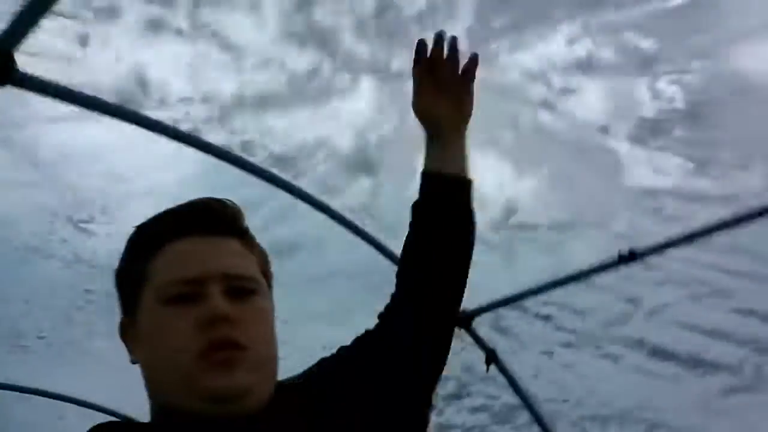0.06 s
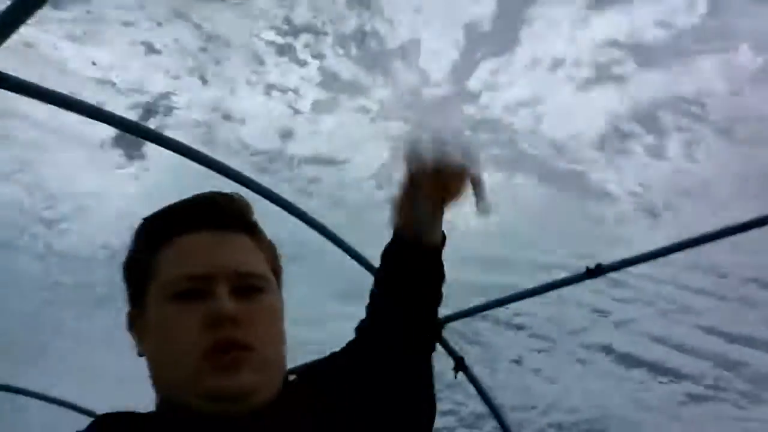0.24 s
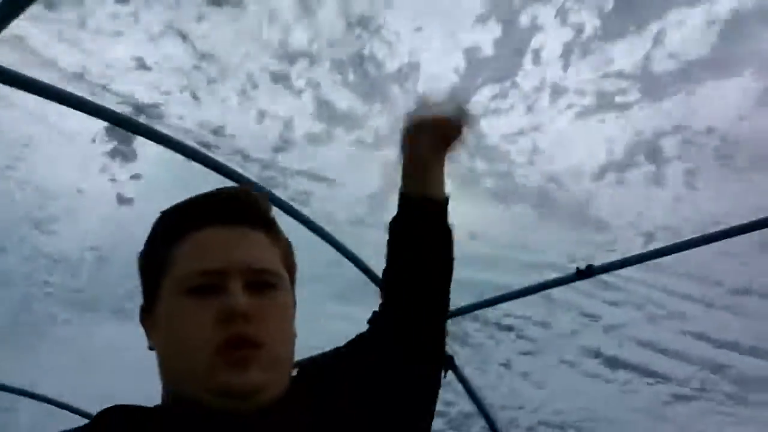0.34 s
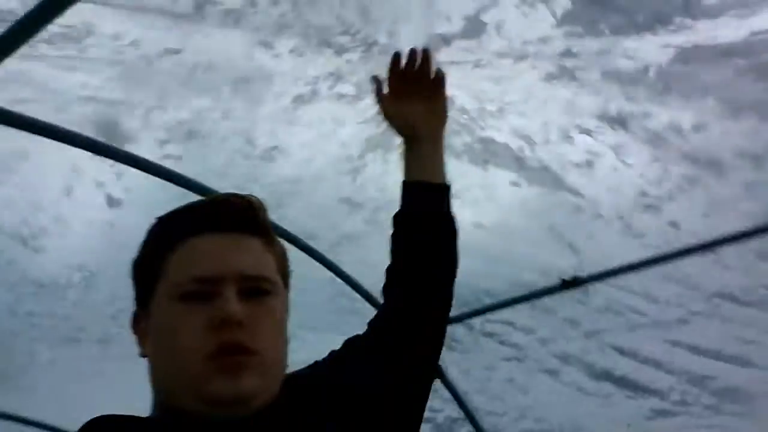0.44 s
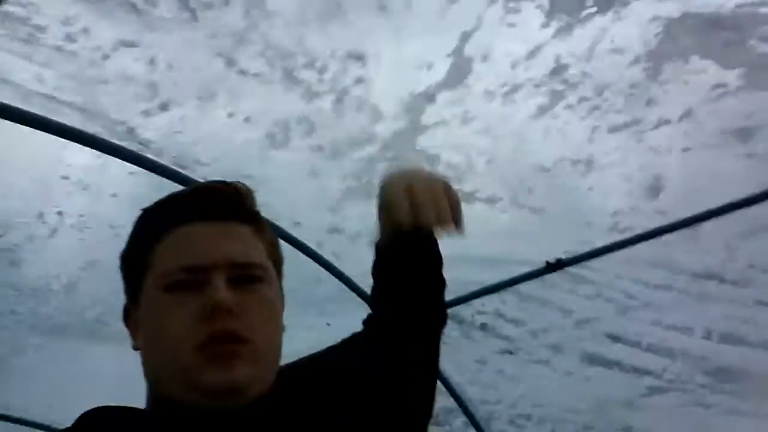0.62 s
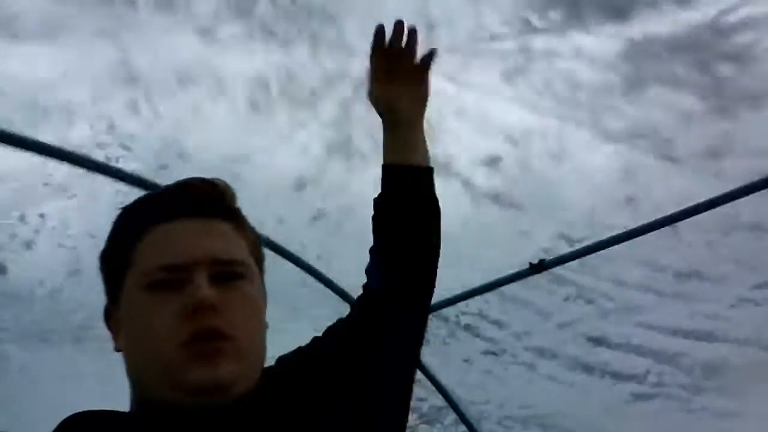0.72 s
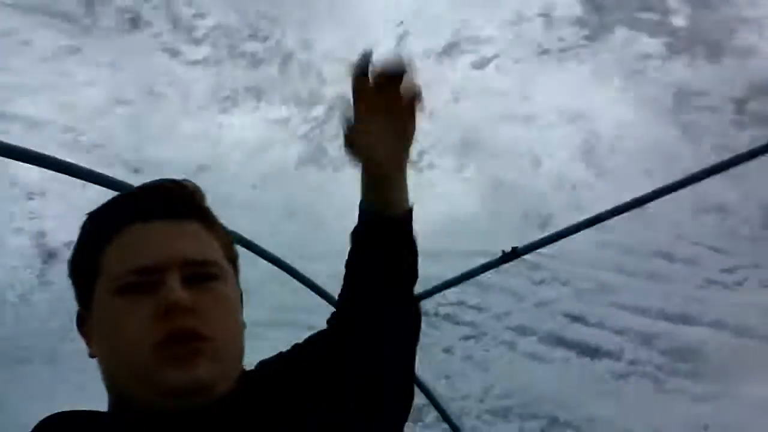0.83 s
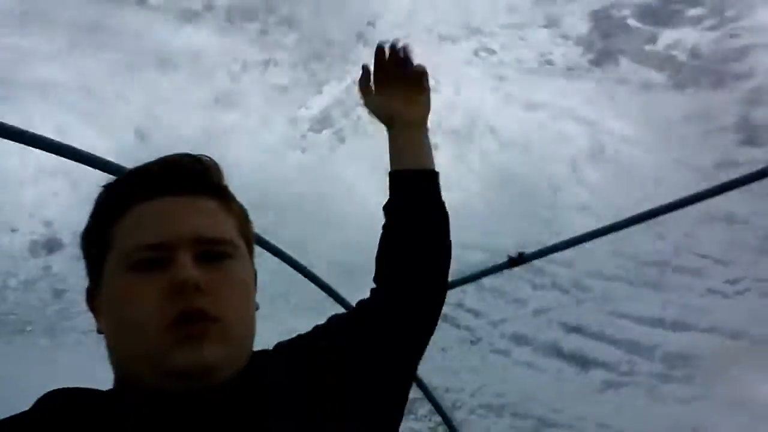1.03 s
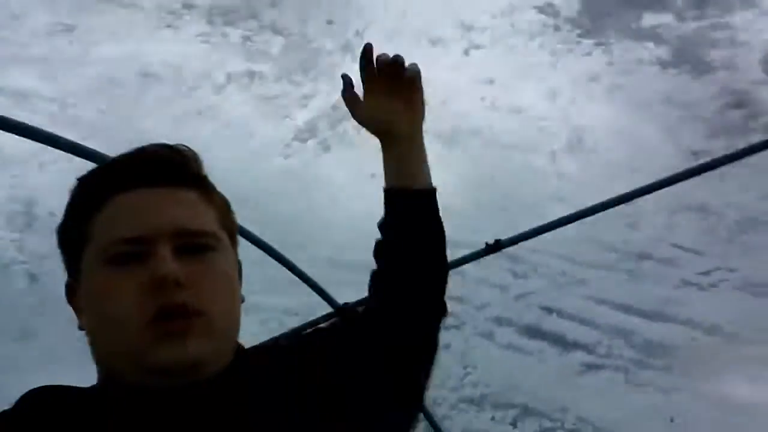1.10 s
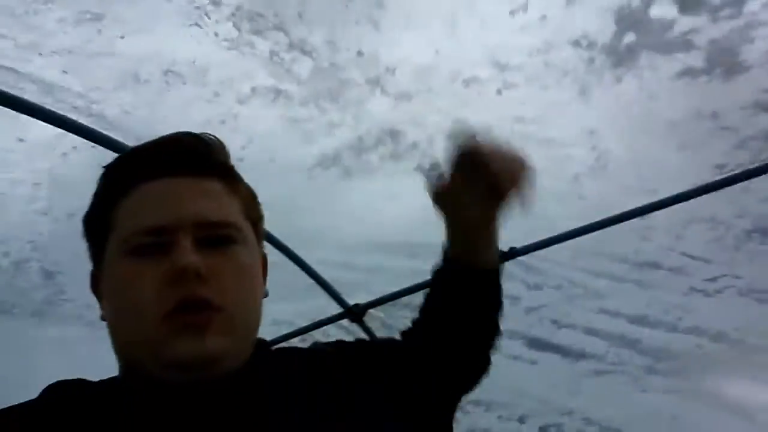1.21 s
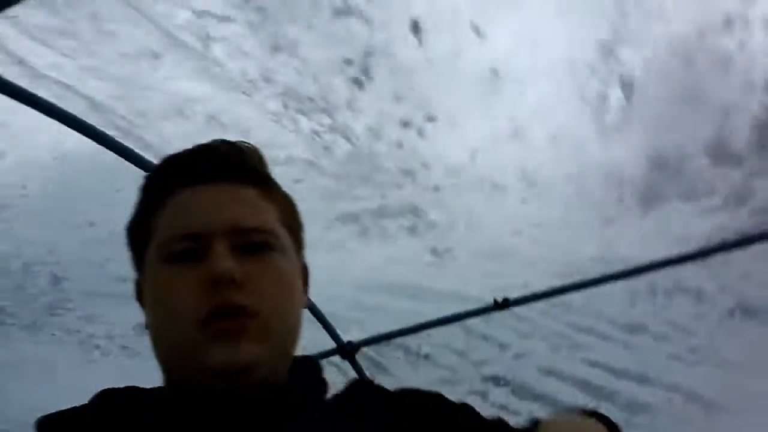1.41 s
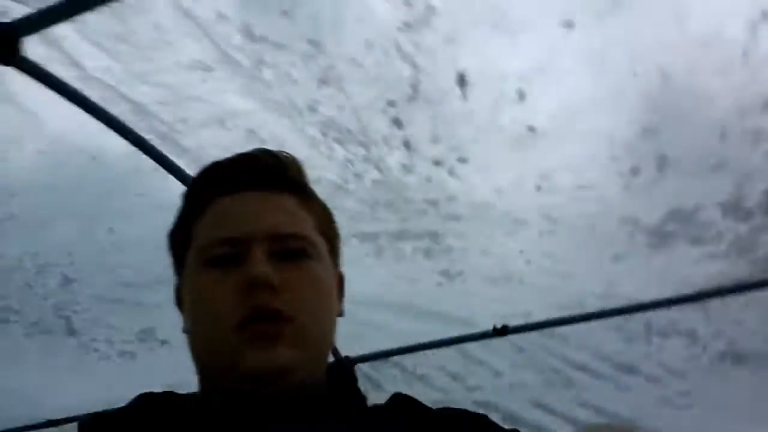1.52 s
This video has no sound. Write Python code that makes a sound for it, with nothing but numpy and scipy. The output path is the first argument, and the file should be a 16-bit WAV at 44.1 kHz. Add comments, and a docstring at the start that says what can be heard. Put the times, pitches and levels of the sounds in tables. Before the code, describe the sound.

A hand strikes a stretched plastic cover four times, at about 0.2, 0.5, 0.85 and 1.15 seconds. Each blow is a loud, low thump with a sharp crinkle, followed by a short flutter and fading rustle. The last snaps hardest and dies away by 1.5 seconds. The hits sound close, with slight reflections under the cover, while a steady hiss and faint patter continue throughout.

```python
"""Under a wet plastic cover stretched over a hoop frame, a hand pushes up four times against the film.
At each blow creases crinkle as the hand meets them; the film snaps taut, radiating pressure pulses
and a low thump from its damped modes, then shakes out in a dying rustle. Short reflections gather
beneath the cover. Between blows a steady hiss and a light patter on the cover remain."""
import sys
import numpy as np
from scipy import signal
from scipy.fft import rfft, irfft
from scipy.io import wavfile

SR = 44100
rng = np.random.default_rng(int(sys.argv[2]) if len(sys.argv) > 2 else 0)


def generate_wav(sig):
    """Save sig (samples, or channels by samples) to the path in sys.argv[1] as 16-bit PCM at SR."""
    pcm = np.round(np.clip(np.atleast_2d(sig).T, -1, 1) * 32767).astype(np.int16)
    wavfile.write(sys.argv[1], SR, pcm)


N = 68355

# Spectrum of the hiss: frequency_hz, relative_density_db
HISS_SPECTRUM = [(30, -41), (65, -13.5), (140, -2.5), (300, 0.5), (600, 1.5), (1500, -1), (3000, -3),
                 (5700, -4), (7200, -9.5), (9500, -19), (15500, -17.5)]
# Slow drift of the hiss: time_s, level_db
HISS_LEVEL = [(0, -31.5), (.13, -35.5), (.47, -35.5), (.78, -36.5), (1.08, -36), (1.4, -35.5),
              (1.55, -37.5)]
# Drift of its treble: time_s, gain_db
HISS_TREBLE = [(0, -2), (.12, -1.5), (.45, 1.5), (.78, 5), (1.1, 4), (1.55, 4)]
# Spectrum of the dying rustle: frequency_hz, relative_density_db
RUSTLE_SPECTRUM = [(40, -30), (100, -2.5), (300, -0.5), (650, 3.5), (1300, -3), (2800, -5), (5800, -9),
                   (9300, -20), (15500, -37)]
# The film flaps back or a crease ticks: start_s, level_db, t60_s
FLAPS = [(.003, -28, 0.13), (0.364, -32.5, 0.3), (0.63, -27, 0.4), (1.015, -39, 0.04), (1.222, -26, 0.12),
         (1.289, -35, 0.12), (1.335, -32, 0.038)]
# Swings of the slack cover: start_s, level_db, pitch_hz, t60_s
WOBBLES = [(0.205, -28, 116, 0.12), (.226, -23.5, 223, 0.086), (.232, -41, 52, 0.13),
           (0.271, -33.5, 327, 0.34), (.524, -32, 61.6, 0.065), (0.536, -23.5, 234, 0.12),
           (.575, -46, 104.3, 0.42), (.72, -43, 200, 0.14), (.840, -36, 60.4, 0.091), (.841, -25, 330, .09),
           (.885, -22.5, 158, 0.078), (1.151, -27, 62, 0.092), (1.157, -23, 326.6, 0.17),
           (1.183, -26.5, 139, 0.15)]
# Resonances of the cover and the air under it: pitch_hz, relative_level_db, t60_s
COVER_MODES = [(141, -27, .2), (195, -24, .16), (228, -22, .18), (277, -25, .2), (337, -22, .22),
               (391, -23, .2), (430, -25, .18), (750, -23, .2), (942, -23, .16), (1118, -24, .18),
               (1245, -23, .18), (1566, -24, .15), (2130, -24, .14)]
# Spectrum of the shuddering sheet: frequency_hz, relative_density_db
FLUTTER_SPECTRUM = [(40, -35), (80, -14), (130, -3), (220, 5.5), (340, 4.5), (500, 1), (900, -12.5),
                    (2500, -38)]
# Single creases giving way: peak_s, level_db
CRACKS = [(.233, -19), (0.519, -21), (.538, -15.5), (.564, -20), (.857, -24), (.872, -20), (1.149, -16.5),
          (1.226, -36)]
# Spectrum of a crack: frequency_hz, relative_density_db
CRACK_SPECTRUM = [(300, 3.5), (1000, 5.5), (3000, 0.5), (5500, -5), (9300, -16), (15500, -13.5)]
# Spectrum of the crinkling film: frequency_hz, relative_density_db
CRINKLE_SPECTRUM = [(100, -29), (250, -19), (500, -2), (1000, -3), (2000, -6), (3200, -9), (5500, -9),
                    (7200, -14), (9300, -23.5), (15500, -21)]
# Blows of the hand: touch_s, taut_s, crinkle_touch_db, crinkle_taut_db, crinkle_t60_s,
# flutter_touch_db, flutter_taut_db, rustle_db, rustle_t60_s
BLOWS = [(0.207, 0.238, -23.5, -18, 0.45, -21.5, -22, -38, 1),
         (0.511, .542, -27.5, -17, 0.35, -25.5, -28.5, -25, 1),
         (0.807, 0.85, -45, -16, 0.37, -43.5, -23.5, -26.5, 0.98),
         (1.132, 1.162, -32.5, -16.5, 0.48, -36, -22, -31, 0.46)]
# Pressure pulses of the slapping film: centre_s, peak_db, centre_hz
SLAPS = [(0.2088, -18.5, 550), (0.231, -9, 475), (0.2354, -7, 226), (0.516, -21.5, 400), (0.5396, -11, 660),
         (.852, -16.5, 297), (.858, -12, 800), (1.159, -2.5, 810), (1.163, -10, 292)]

ONSET_S = 0.0013


def from_db(db):
    """Amplitude grows tenfold for every 20 dB."""
    return 10 ** (np.asarray(db) / 20)


def unit_rms(x):
    """Normalisation to a mean power of one."""
    return x / np.sqrt(np.mean(x ** 2) + 1e-20)


def seconds():
    """Uniform sampling of time."""
    return np.arange(N) / SR


def gain_curve(points):
    """Gain interpolated linearly in decibels over time."""
    return from_db(np.interp(seconds(), *np.transpose(points)))


def colour(x, spectrum):
    """Linear filtering weights each frequency of a steady sound; rms 1."""
    hz, db = np.transpose(spectrum)
    log_hz = np.log(np.maximum(np.fft.rfftfreq(N, 1 / SR), 1))
    gain = from_db(np.interp(log_hz, np.log(hz), db))
    return unit_rms(irfft(rfft(x) * gain, N))


def decay(start_s, t60_s):
    """Exponential damping after a sudden onset: 60 dB lost in t60_s."""
    age = seconds() - start_s
    return np.clip(age / ONSET_S, 0, 1) * np.exp(-np.log(1000) * np.maximum(age, 0) / t60_s)


def swell(touch_s, taut_s, touch_db, taut_db, t60_s):
    """Forced, then free motion: the level ramps from touch to tautness, then decays exponentially."""
    t = seconds()
    onset = np.clip((t - touch_s) / ONSET_S + 1, 0, 1)
    ramp = gain_curve([(touch_s, touch_db), (taut_s, taut_db)])
    return onset * ramp * np.exp(-np.log(1000) * np.maximum(t - taut_s, 0) / t60_s)


def resonator(x, hz, t60_s):
    """A damped oscillator answers a unit impulse with a decaying cosine of height 1."""
    radius = np.exp(-np.log(1000) / (t60_s * SR))
    pole_real = radius * np.cos(2 * np.pi * hz / SR)
    return signal.lfilter([1, -pole_real], [1, -2 * pole_real, radius ** 2], x + 1e-18)


def reflections(x, wet_db, echoes_per_s=1700):
    """Reverberation: dense, short echoes under the cover add to the direct sound."""
    echoes = rng.standard_normal(N) * (rng.random(N) < echoes_per_s / SR)
    echoes *= decay(start_s=0.0029, t60_s=0.11)
    return x + from_db(wet_db) * signal.fftconvolve(x, echoes / np.linalg.norm(echoes))[:N]


def shot_noise(per_s, spread_db):
    """Shot noise: independent clicks, most small and a few large, with their echoes; rms 1."""
    sizes = from_db(spread_db * np.minimum(rng.exponential(1, N), 5))
    clicks = sizes * rng.choice([-1, 1], N) * (rng.random(N) < per_s / SR)
    return unit_rms(reflections(clicks, wet_db=-7.5))


def hiss(patter_share=0.26, treble_hz=7260):
    """Incoherent sources add in power: a steady hiss and a fine patter on the cover."""
    patter = np.sqrt(patter_share) * shot_noise(per_s=1500, spread_db=4)
    smooth = np.sqrt(1 - patter_share) * rng.standard_normal(N)
    noise = colour(patter + smooth, HISS_SPECTRUM)
    treble = signal.sosfiltfilt(signal.butter(2, treble_hz, "high", fs=SR, output="sos"), noise)
    return gain_curve(HISS_LEVEL) * (noise + (gain_curve(HISS_TREBLE) - 1) * treble)


def crease_noise(smooth_share=0.37):
    """Buckling creases click; countless tiny ones merge into Gaussian noise."""
    clicks = np.sqrt(1 - smooth_share) * shot_noise(per_s=7000, spread_db=3)
    return clicks + np.sqrt(smooth_share) * rng.standard_normal(N)


def rustle():
    """Free decay: the cover rustles on after each blow, its separate flaps adding in power."""
    power = sum(swell(touch, taut, db - 7.5, db, t60) ** 2 for touch, taut, *_, db, t60 in BLOWS)
    power += sum((from_db(db) * decay(start, t60)) ** 2 for start, db, t60 in FLAPS)
    return np.sqrt(power) * colour(crease_noise(), RUSTLE_SPECTRUM)


def wobbles(rise_s=0.0045):
    """Damped oscillation: the slack cover swings as it is lifted and drops back."""
    out = np.zeros(N)
    for start, db, hz, t60 in WOBBLES:
        age = np.maximum(seconds() - start, 0)
        envelope = (1 - np.exp(-age / rise_s)) * decay(start, t60)
        out += 2 * from_db(db) * envelope * np.sin(2 * np.pi * hz * age)
    return out


def cover_resonance(x, drive_db):
    """Forced resonance: sound on the cover drives its modes and those of the air beneath."""
    return from_db(drive_db) * sum(from_db(db) * resonator(x, hz, t60) for hz, db, t60 in COVER_MODES)


def flutter(t60_s=0.37):
    """Modal overlap: the many low modes of the shuddering sheet blend into a band of noise."""
    envelope = sum(swell(touch, taut, touch_db, taut_db, t60_s)
                   for touch, taut, _, _, _, touch_db, taut_db, _, _ in BLOWS)
    return envelope * colour(rng.standard_normal(N), FLUTTER_SPECTRUM)


def cracks(rise_s=0.0042, t60_s=0.046):
    """Snap-through: larger creases release their elastic energy in short, bright bursts."""
    bursts = sum(swell(peak_s - rise_s, peak_s, db - 9.5, db, t60_s) for peak_s, db in CRACKS)
    return bursts * colour(crease_noise(), CRACK_SPECTRUM)


def crinkle():
    """Buckling under load: creases crackle under the hand, loudest as the film comes taut."""
    envelope = sum(swell(touch, taut, touch_db, taut_db, t60)
                   for touch, taut, touch_db, taut_db, t60, *_ in BLOWS)
    return envelope * colour(crease_noise(), CRINKLE_SPECTRUM)


def slaps(low_cut_hz=124):
    """Impulsive radiation: each slap, at its own level and pitch, compresses, then rarefies the air."""
    pulses = np.zeros(N)
    for centre_s, db, hz in SLAPS:
        phase = 2 * np.pi * hz * (seconds() - centre_s)
        pulses -= from_db(db) * phase * np.exp((1 - phase ** 2) / 2)
    pulses = signal.sosfilt(signal.butter(2, low_cut_hz, "high", fs=SR, output="sos"), pulses)
    return reflections(pulses, wet_db=-8.5)


def scene():
    """Superposition: blows and hiss, the resonance they excite and the wobbles sum in one channel."""
    film = crinkle() + cracks() + flutter() + rustle() + slaps() + hiss()
    return (film + cover_resonance(film, drive_db=-41) + wobbles())[None]


def record(dry, overload=0.72, low_cut_hz=48, high_cut_hz=15850):
    """Saturation and band limiting: a small microphone rounds the peaks; deep bass and top are cut."""
    x = dry / (1 + (dry / overload) ** 4) ** (1 / 4)
    x = signal.sosfilt(signal.butter(4, low_cut_hz, "high", fs=SR, output="sos"), x)
    return signal.sosfilt(signal.ellip(12, .1, 80, high_cut_hz, fs=SR, output="sos"), x)


dry = scene()
out = record(dry)
generate_wav(out)
```